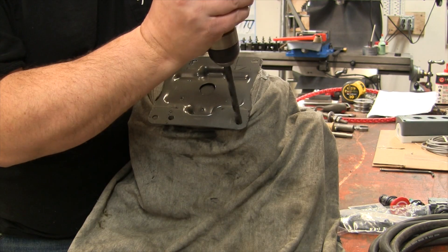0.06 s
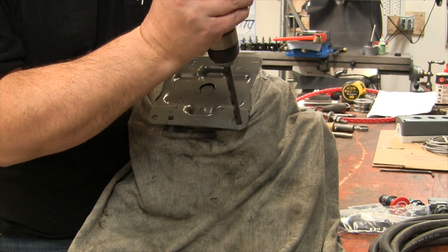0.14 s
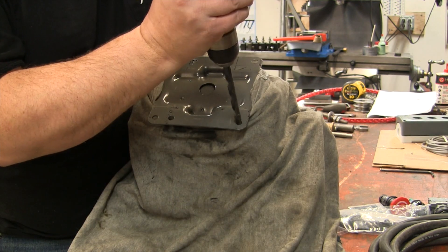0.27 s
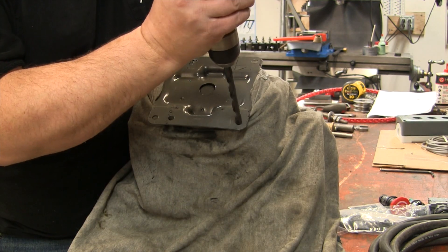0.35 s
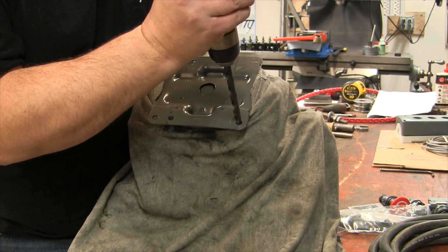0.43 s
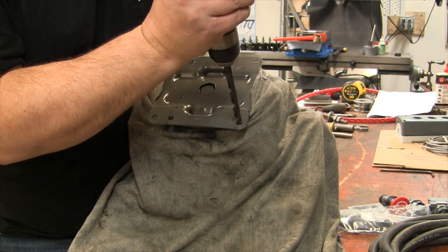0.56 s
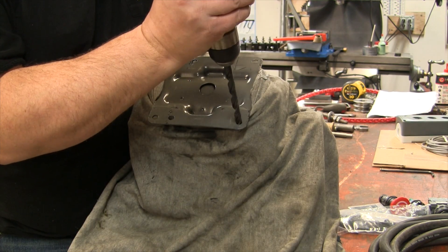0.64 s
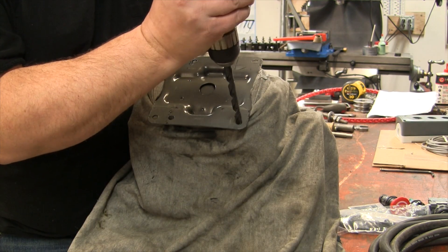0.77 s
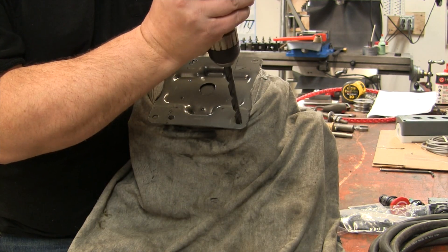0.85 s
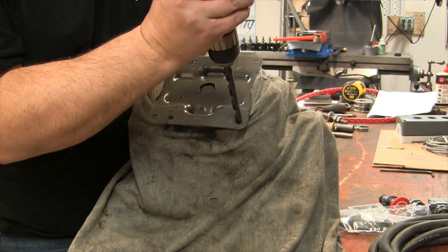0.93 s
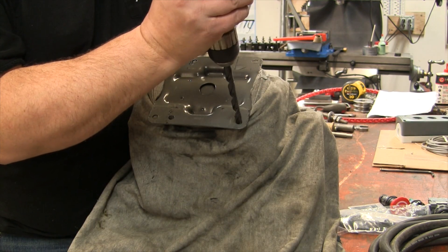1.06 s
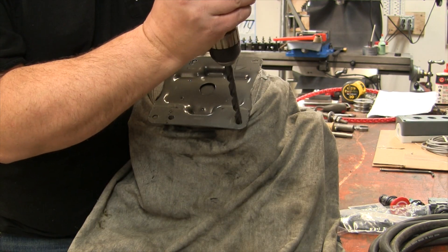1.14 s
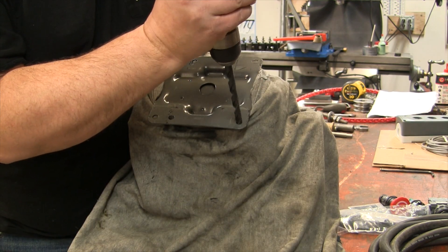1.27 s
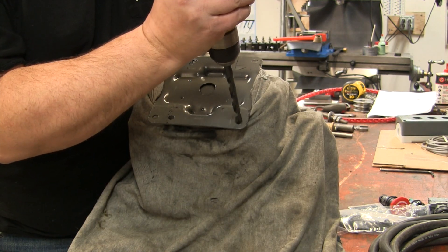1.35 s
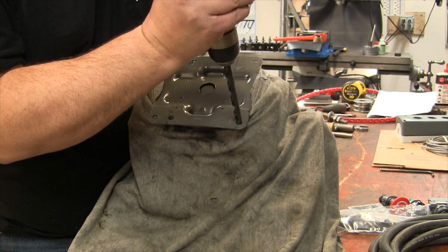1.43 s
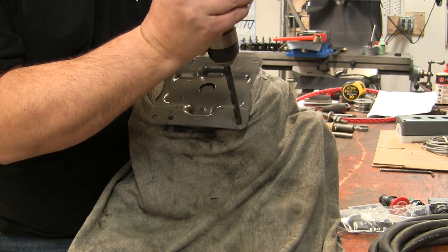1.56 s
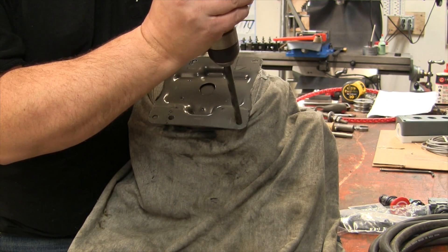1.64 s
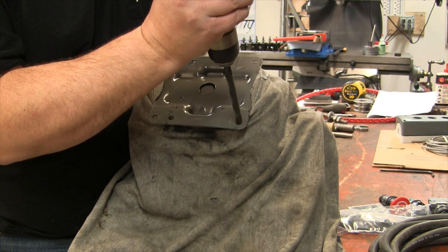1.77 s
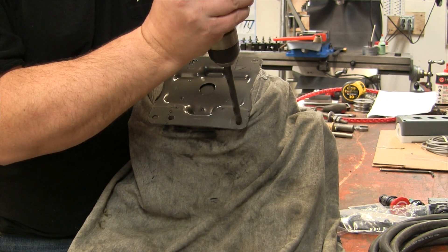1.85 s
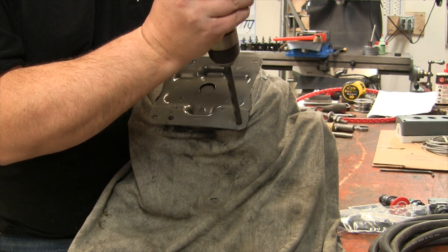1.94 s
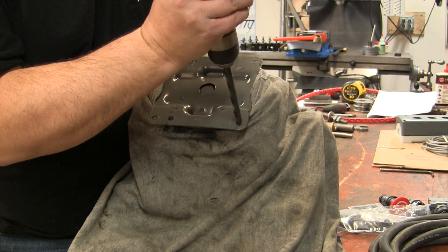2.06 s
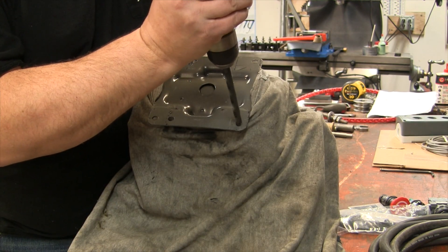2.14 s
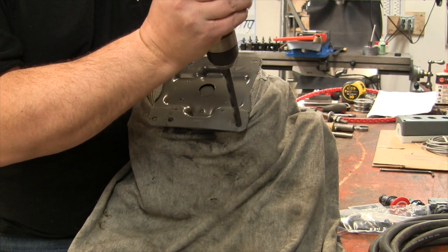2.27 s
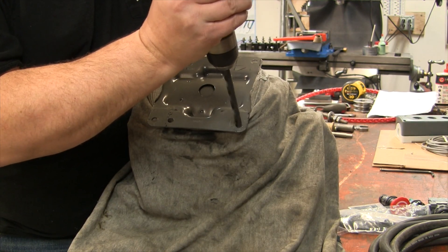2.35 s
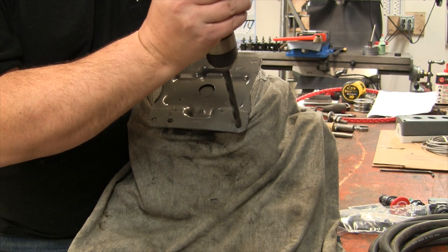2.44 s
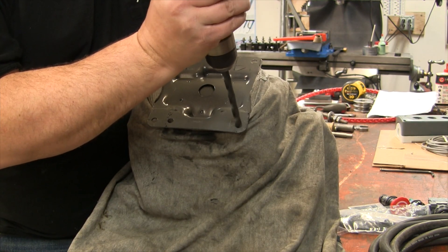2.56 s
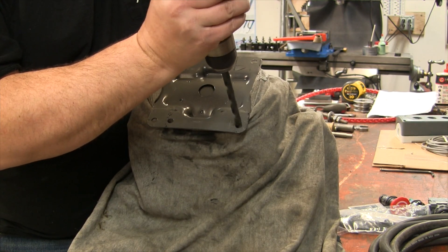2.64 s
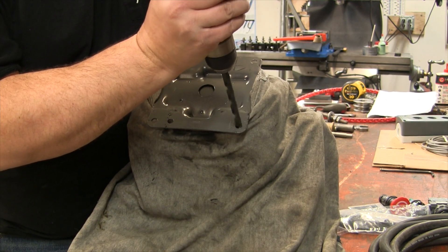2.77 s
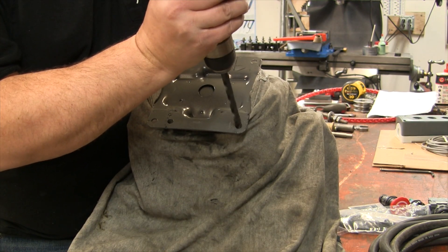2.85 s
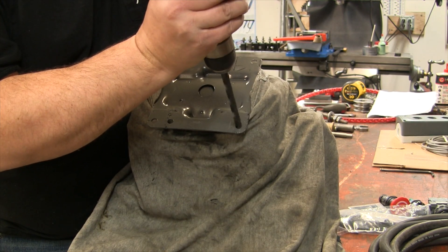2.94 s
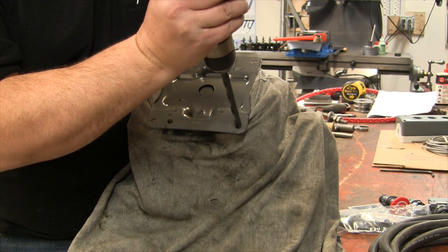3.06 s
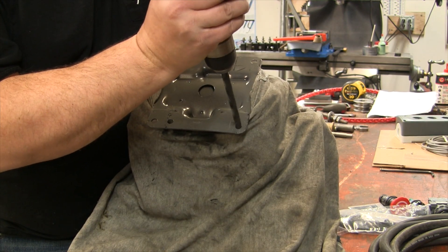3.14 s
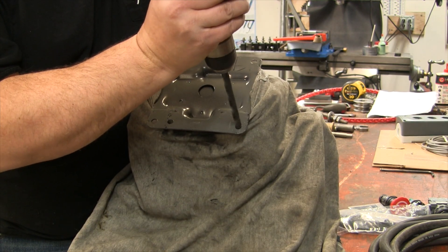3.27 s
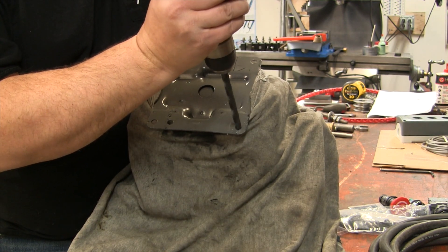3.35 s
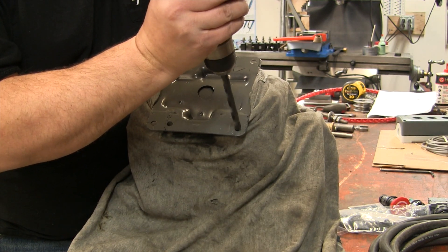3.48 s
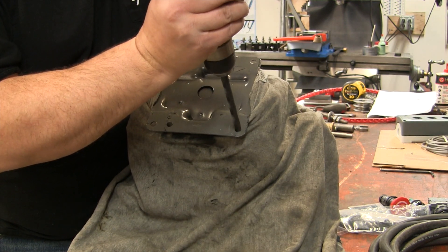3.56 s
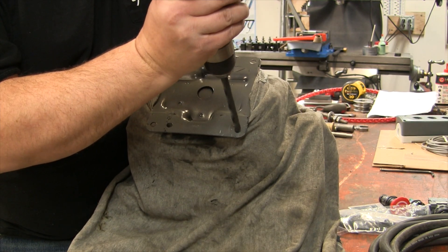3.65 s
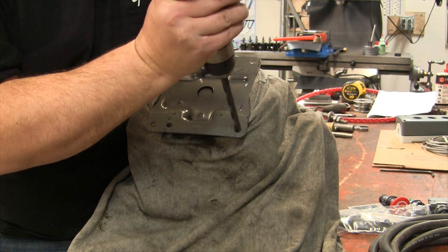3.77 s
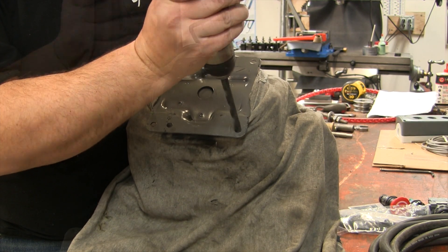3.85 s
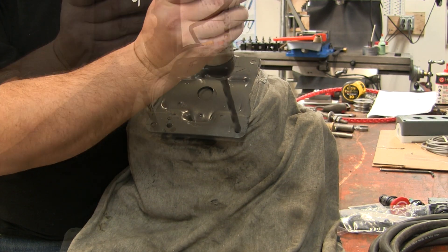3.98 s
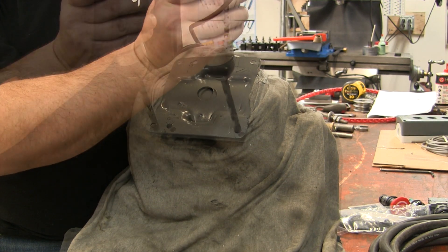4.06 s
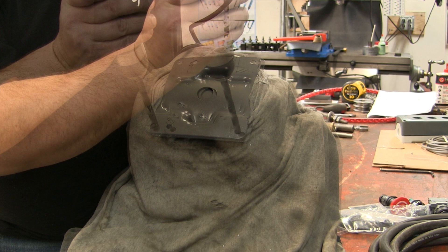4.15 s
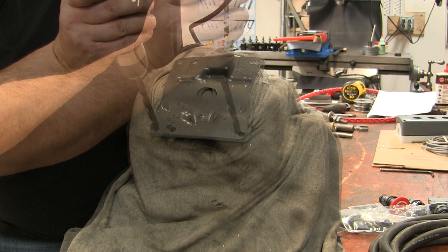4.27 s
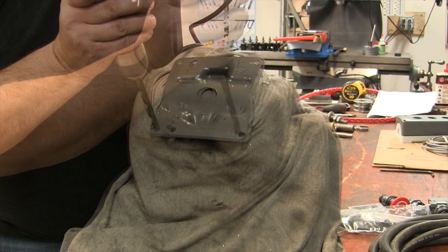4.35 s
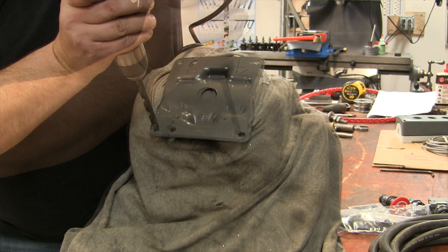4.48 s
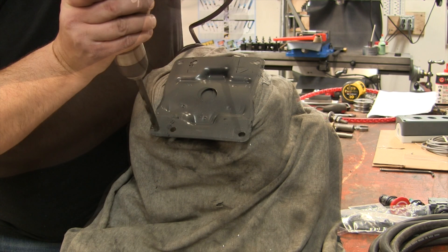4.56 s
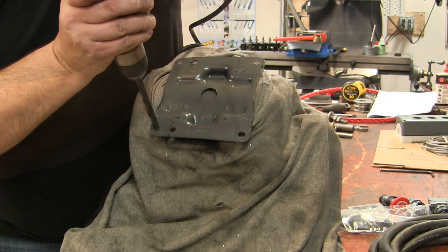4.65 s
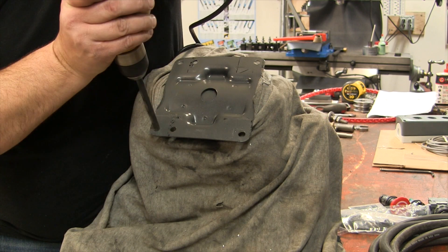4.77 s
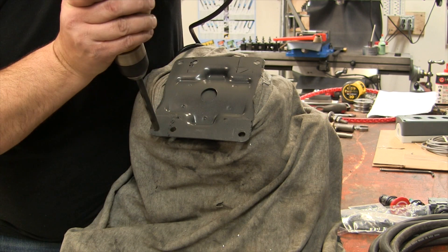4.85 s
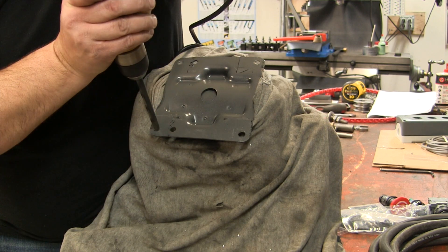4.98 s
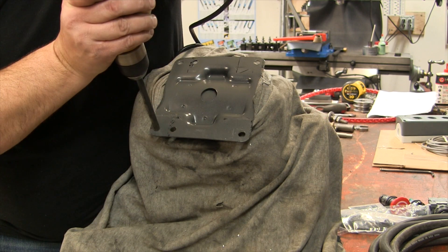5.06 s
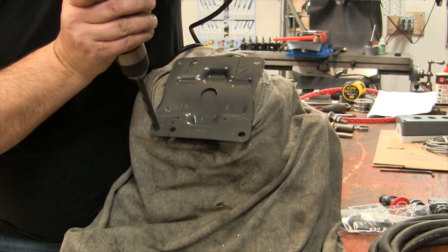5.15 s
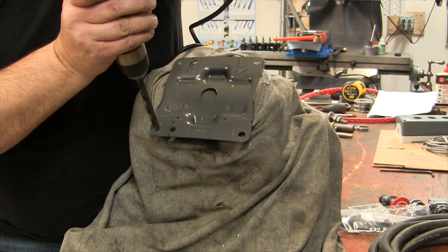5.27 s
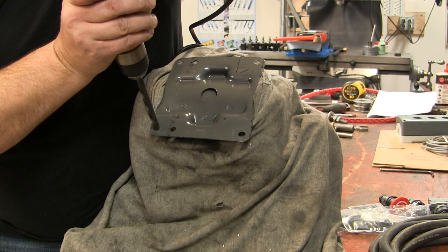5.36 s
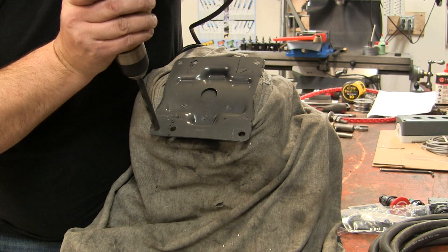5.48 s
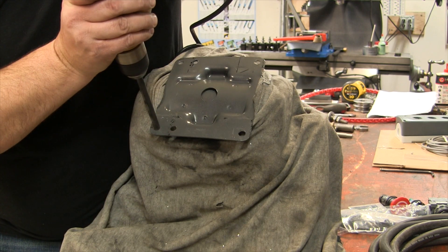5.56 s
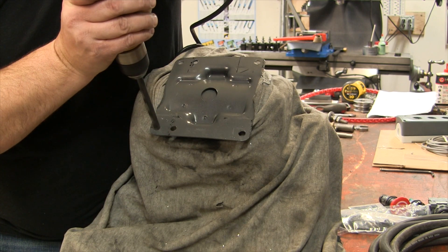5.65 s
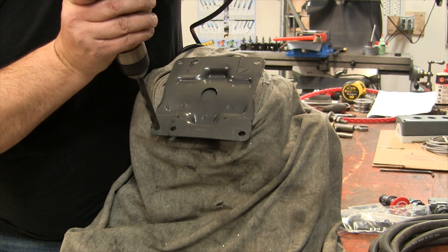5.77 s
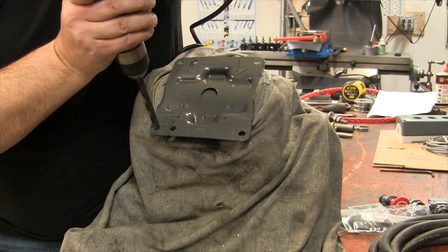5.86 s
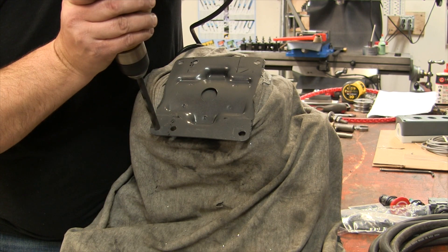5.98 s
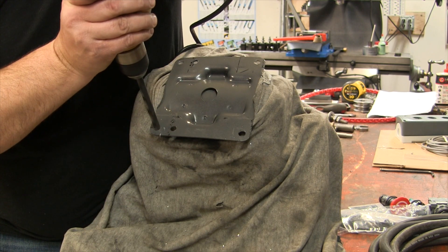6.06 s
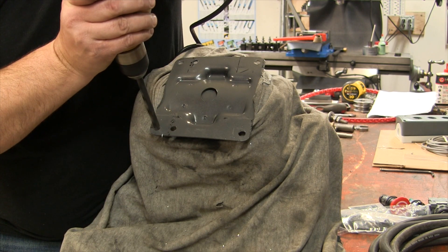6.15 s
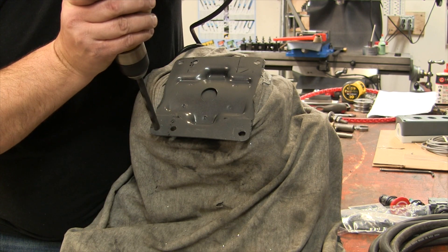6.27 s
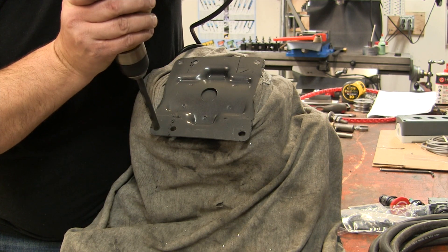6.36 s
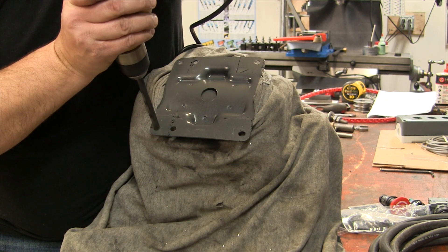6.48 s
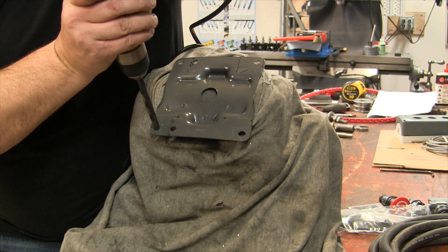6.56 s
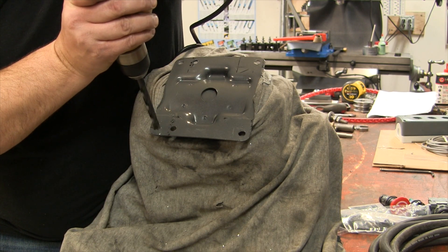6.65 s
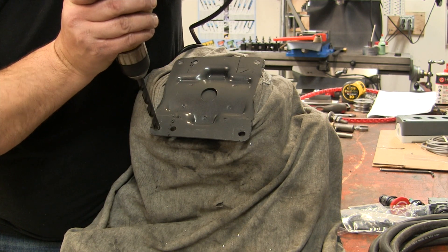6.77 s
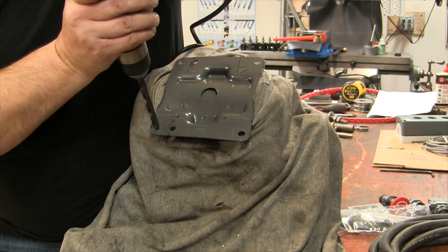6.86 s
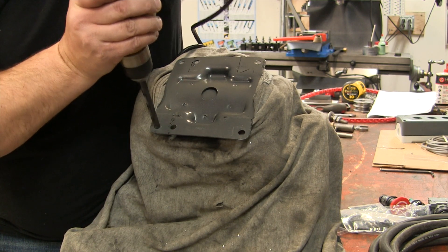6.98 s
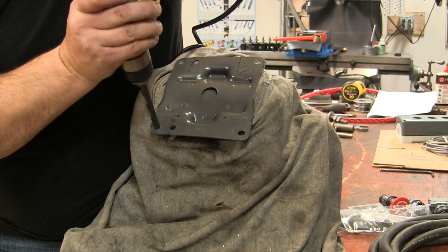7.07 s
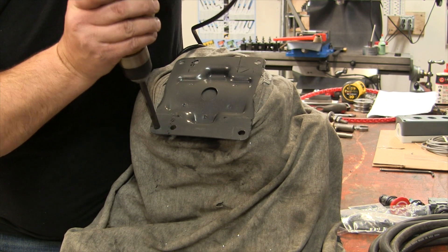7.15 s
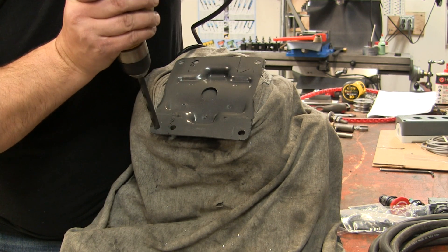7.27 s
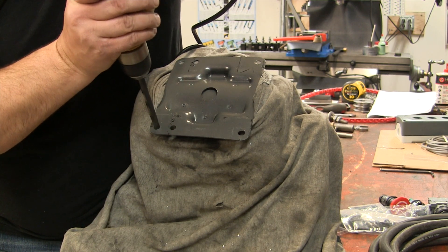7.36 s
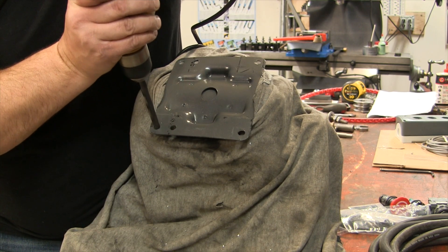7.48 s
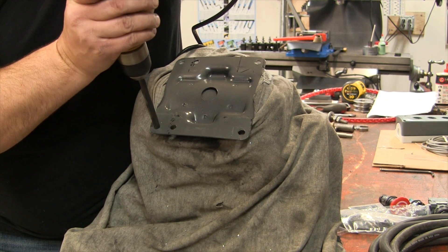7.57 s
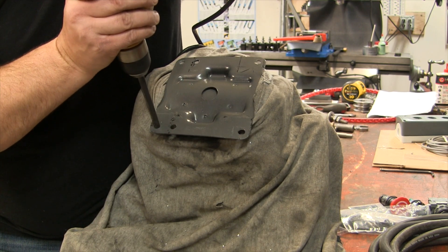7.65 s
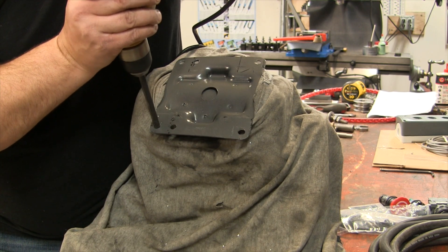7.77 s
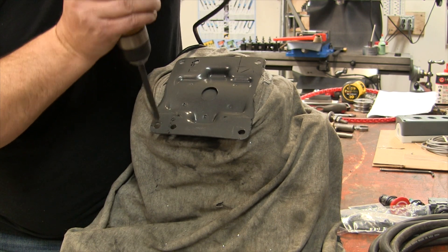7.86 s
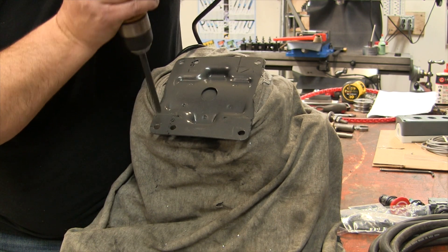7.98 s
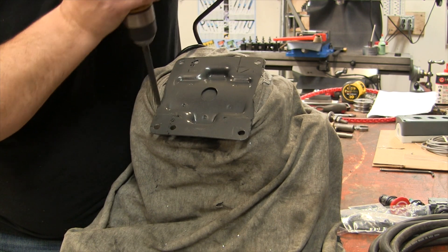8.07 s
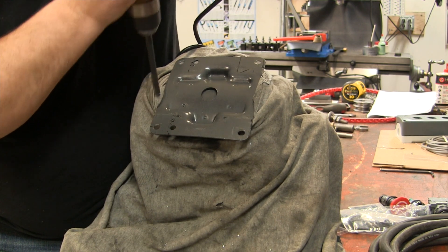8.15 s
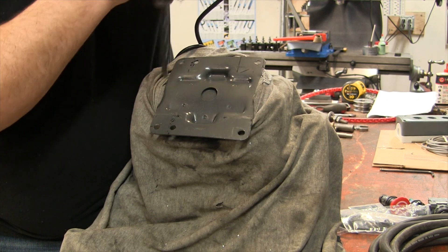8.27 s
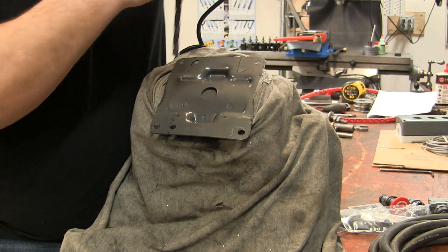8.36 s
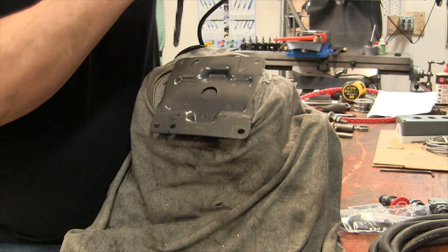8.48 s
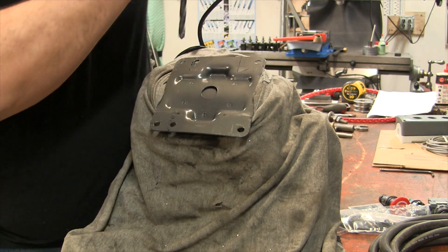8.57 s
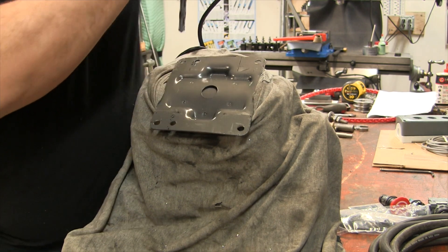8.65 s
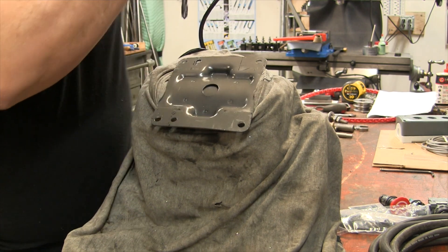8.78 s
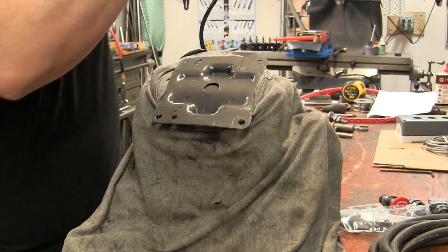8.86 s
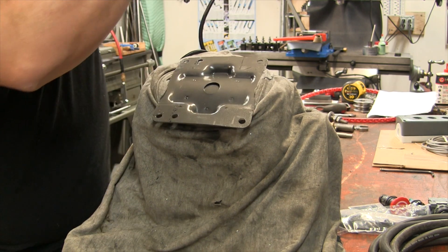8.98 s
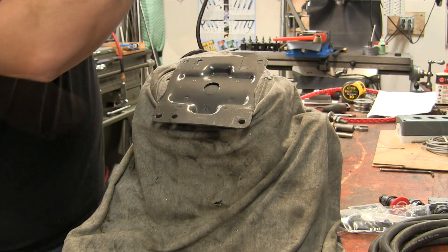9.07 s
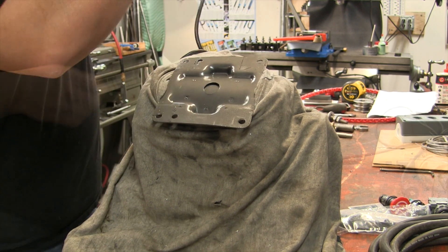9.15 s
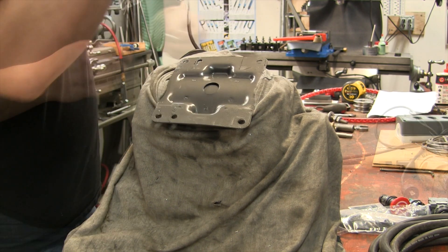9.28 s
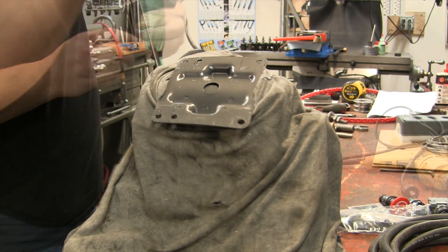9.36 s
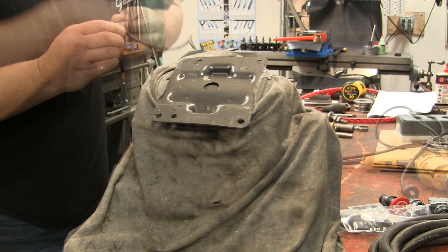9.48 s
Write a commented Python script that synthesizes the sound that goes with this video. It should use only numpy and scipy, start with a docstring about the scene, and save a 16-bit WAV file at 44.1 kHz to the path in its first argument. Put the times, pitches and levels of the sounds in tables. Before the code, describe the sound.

A cordless drill grinds and chatters through two bolt holes in a steel plate, squealing in the second, then whines free, coasts down and thuds onto a bench.

```python
"""Drilling two holes in steel

A cordless drill reams two bolt holes in a steel plate in a workshop, heard at one close microphone.
Noise bursts form the grinding gears and the flutes that bite the rim 13 to 40 times a second.
Between bites in the second hole, brief wavering tones make the edge squeak and the shank chirp.
The bit comes free with a rising and falling whine; gears rattle as the drill coasts, then it thuds down.
Steel clacks, loose ticks, a short room tail and a faint room tone surround the work."""
import sys
import numpy as np
from scipy import signal
from scipy.fft import rfft, irfft
from scipy.io import wavfile
from scipy.ndimage import uniform_filter1d

SR = 44100
rng = np.random.default_rng(int(sys.argv[2]) if len(sys.argv) > 2 else 0)


def store_pcm(level_fs):
    """Save levels as 16-bit WAV."""
    pcm = np.round(np.clip(level_fs, -1, 1) * 32767).astype(np.int16)
    wavfile.write(sys.argv[1], SR, np.atleast_2d(pcm).T)


N = 419876
TIME = np.arange(N) / SR
GRID_HZ = np.fft.rfftfreq(4096, 1 / SR) + 1e-3


def from_db(db):
    """Decibels to amplitude gain."""
    return 10 ** (np.asarray(db) / 20)


def rms_one(x):
    """Scale to unit power."""
    return x / np.sqrt(np.mean(x ** 2) + 1e-20)


def in_time(rows):
    """The columns of a curve, joined by straight lines over the whole scene."""
    s, *columns = np.transpose(rows)
    return [np.interp(TIME, s, c) for c in columns]


def drift(rate):
    """Random curve of unit power: straight lines between new values, rate of them a second."""
    return rms_one(np.interp(TIME * rate, np.arange(N), rng.standard_normal(N)))


def band(x, order, hz, kind="low"):
    """Butterworth filter: low-pass, high-pass or band-pass."""
    return signal.sosfilt(signal.butter(order, hz, kind, fs=SR, output="sos"), x)


def coloured(x, spectrum):
    """Minimum-phase filter with the given colour and unit power gain for white noise."""
    hz, db = np.transpose(spectrum)
    level = np.interp(np.log(GRID_HZ), np.log(hz), db)
    cepstrum = irfft(np.log(from_db(level)))
    half = len(cepstrum) // 2
    # folding the cepstrum onto positive time makes the filter causal
    cepstrum[1:half] *= 2
    cepstrum[half + 1:] = 0
    response = irfft(np.exp(rfft(cepstrum)))
    return signal.oaconvolve(x, response / np.linalg.norm(response))[:N]


def resonate(x, modes):
    """Parallel decaying resonances with unit power gain for white noise."""
    t = TIME[:SR // 5]
    response = np.zeros(len(t))
    for hz, width, db in modes:
        decay = np.exp(-np.pi * width * t)
        response += from_db(db) * width * decay * np.cos(2 * np.pi * hz * t)
    return signal.oaconvolve(x, response / np.linalg.norm(response))[:N]


def decaying(kicks, decay_s):
    """Each kick jumps up at once and dies away exponentially."""
    return signal.lfilter([1], [1, -np.exp(-1 / (decay_s * SR))], kicks + 1e-18)


def grit(rate, spread_db):
    """Dense tiny fractures: noise whose strength jumps at random and dies away at once."""
    sizes = from_db(spread_db * np.minimum(rng.exponential(1, N), 4))
    kicks = (rng.random(N) < rate / SR) * sizes
    power = decaying(kicks ** 2, 0.0012)
    return rms_one(np.sqrt(power) * rng.standard_normal(N))


def swell(s, length, lean):
    """Samples and envelope of one brief contact; a lean above 1 rises faster than it falls."""
    first = max(int((s - 3 * length) * SR), 0)
    at = np.arange(first, min(int((s + 4 * length) * SR), N))
    u = (at / SR - s) / length
    return at, np.exp(-np.log(4) * (u / np.where(u < 0, 1 / lean, lean)) ** 2)


def slips(rows, length, waver, waver_rate, sag):
    """Brief stick-slip tones whose pitch wavers and sags; returns the tones and their envelope."""
    tones, envelope, wander = np.zeros(N), np.zeros(N), drift(waver_rate)
    for s, db, hz in rows:
        at, shape = swell(s, length, lean=1.0)
        pitch = hz * (1 + waver * wander[at] - sag * (TIME[at] - s))   # sag: share of the pitch per s
        phase = 2 * np.pi * np.cumsum(pitch) / SR
        tones[at] += from_db(db) * shape * np.sqrt(2) * np.sin(phase)
        envelope[at] += from_db(db) * shape
    return tones, envelope


def burst(s, db, t60):
    """Noise that starts at once and dies away."""
    out, start = np.zeros(N), int(s * SR)
    t = TIME[:min(SR // 2, N - start)]
    out[start:start + len(t)] = from_db(db - 60 * t / t60) * rng.standard_normal(len(t))
    return out


# colour of the quiet room: (frequency [Hz], level per hertz [dB])
ROOM_TONE = [(12, -27.5), (20, -4), (27, -35.5), (139, -28), (233, -15), (266, -7.5), (401, -15),
             (1700, -10), (1950, -19), (13500, -38)]


def room_floor():
    """Steady coloured noise stands for the faint tone of the room."""
    return from_db(-51.0) * coloured(rng.standard_normal(N), ROOM_TONE)


def workshop(x, t60, dull_hz):
    """A short diffuse tail from the cluttered room, poorer in treble."""
    t = TIME[:SR // 2]
    tail = rng.standard_normal(len(t)) * from_db(-60 * t / t60) * (t > .006)
    tail = band(tail, 1, min(dull_hz, .45 * SR))
    return signal.oaconvolve(x, tail / np.linalg.norm(tail))[:N]


# where the bit sits: (time [s], share of the second hole, share of free running in what is not the first)
CONTACT = [(4.1, 0.35, 0), (4.65, 1, 0.047), (6.7, 1, 0.022), (6.92, 0.8, 0.53), (7.75, 0.93, 0.21),
           (7.9, 1, 1)]


def shares():
    """How much of the sound comes from the first hole, the tight second hole and the freed drill."""
    second, free = np.clip(in_time(CONTACT), 0, 1)
    return 1 - second, second * (1 - free), second * free


# colours of cutting in each hole and of the bare drill: (frequency [Hz], level per hertz [dB])
FIRST_HOLE = [(210, -53), (350, -26), (623, -12), (799, -4), (875, -6), (1170, -0.5), (1540, -2),
              (1950, 2.5), (2250, 0), (3160, -8.5), (3420, -2.5), (3790, -8), (4620, -8.5), (6750, -26.5),
              (8000, -39), (10400, -33), (17600, -120)]
SECOND_HOLE = [(210, -79.5), (350, -24.5), (498, -19.5), (898, -9.5), (1040, -5), (1870, -3), (2050, -3.5),
               (2430, 5), (3040, -4.5), (4210, 0), (4860, -1.5), (5330, -6.5), (6000, -10.5), (6660, -18.5),
               (8000, -23.5), (10400, -27), (17600, -120)]
FREE_RUN = [(180, -42.5), (300, -18), (506, -6.5), (564, -2.5), (647, -5.5), (774, -3), (1120, 3.5),
            (2200, -1.5), (2670, -1.5), (3710, -7), (4810, -8), (6970, -26), (8000, -28), (10400, -40),
            (17600, -120)]
# rings of plate and bit in the second hole: (frequency [Hz], width [Hz], level [dB])
STEEL = [(1090, 98, -9), (1900, 27, 2), (2280, 53, -9), (3200, 79, -4), (4860, 51, 1), (4730, 130, 8),
         (4960, 80, 17), (5830, 130, -29)]


def cut_colour(x, steel_db):
    """Vibration radiates through the first hole, the ringing second hole, then the bare drill."""
    first, second, free = x * np.sqrt(shares())
    plate = from_db(-2.5) * coloured(second, SECOND_HOLE) + from_db(steel_db) * resonate(second, STEEL)
    return coloured(first, FIRST_HOLE) + plate + coloured(free, FREE_RUN)


# colour of rubbing and breaking chips: (frequency [Hz], level per hertz [dB])
CHIPS = [(3530, -49), (6000, -1.5), (6420, -10.5), (6730, -11.5), (7380, -12.5), (10300, -10),
         (13200, -11.5), (14000, -19), (14700, -27), (15500, -45)]


def chip_colour(x):
    """Small chips radiate mostly treble."""
    return coloured(x, CHIPS)


# high modes of the bit: (frequency [Hz], width [Hz], level [dB])
BIT = [(5850, 180, -1), (7170, 220, 2), (7630, 140, -10), (7880, 300, -1), (9120, 250, 2), (9530, 360, -4),
       (10450, 200, 7.5), (11360, 130, -5), (11520, 190, 3.5), (12580, 200, -3)]


def bit_ring(x):
    """The bit's high modes, with little outside them."""
    return band(resonate(x, BIT), 6, [5500, 13000], "band")


# the stopped bit rattles loosely in the hole: (start [s], end [s], tick level [dB])
LOOSE = [(.45, .85, -36.5), (.85, 1.24, -45.5), (6.7, 6.93, -32)]
LOOSE_TICKS_PER_S, LOOSE_DECAY_S = 45, 0.0024


def loose_ticks():
    """Light random ticks while the bit rests in the hole."""
    sizes = sum(from_db(db) * ((TIME > start) & (TIME < end)) for start, end, db in LOOSE)
    born = rng.random(N) < LOOSE_TICKS_PER_S / SR
    scatter = from_db(3.9 * np.minimum(rng.standard_normal(N), 1.5))
    ticks = decaying(sizes * born * scatter, LOOSE_DECAY_S) * rng.standard_normal(N)
    return coloured(ticks, FIRST_HOLE) + from_db(-14) * chip_colour(ticks)


# sharp contacts of bit, chuck and trigger: (time [s], level [dB], t60 [s])
CLACKS = [(.054, -10, 0.041), (.095, -12.5, 0.02), (.126, -8.5, 0.045), (.169, -11, .038),
          (0.817, -41, .027), (.895, -28.5, 0.044), (.906, -26, .04), (1.24, -36, .02), (1.263, -2, 0.036),
          (1.614, -10, 0.018), (4.513, -20, 0.026), (6.799, -28, .03), (6.878, -25, .015),
          (6.928, -9.5, 0.034), (7.213, -7.5, .03), (7.371, -8.5, .025), (7.593, -5.5, 0.016),
          (7.782, -10, 0.013), (7.796, -15, 0.041), (9.171, -24.5, .037), (9.19, -26.5, 0.046)]
# the drill knocks on the bench: (time [s], level [dB], t60 [s], upper band edge [Hz])
THUDS = [(8.956, -25.5, 0.21, 353), (9.0, -22, 0.38, 281), (9.188, -30, 0.23, 1500),
         (9.226, -21.5, 0.23, 524), (9.275, -27, 0.53, 300), (9.452, -47, 0.09, 1400)]
# modes of the drill on the bench: (frequency [Hz], width [Hz], level [dB])
BENCH = [(168.5, 53, -30.5), (320, 19, -1.5), (433, 46, 3), (630, 85, 2.5), (990, 270, -7),
         (1500, 280, -2.5)]


def knocks():
    """Steel clacks on the plate, and dull thuds as the drill meets the bench, from decaying noise."""
    clacks = coloured(sum(burst(*row) for row in CLACKS), FIRST_HOLE)
    blows = np.zeros(N)
    for s, db, t60, hz in THUDS:
        blows += band(burst(s, db, t60) + 1e-18, 2, [130, max(hz, 200)], "band")
    return clacks + from_db(5.5) * resonate(blows, BENCH)


# the bit rings on after the drill is set down: (time [s], frequency [Hz], level [dB], t60 [s])
PING = (9.19, 3990, -47, .45)


def ping(s, hz, db, t60):
    """A close pair of long-ringing modes of the steel bit, beating against each other."""
    t = np.maximum(TIME - s, 0)
    pair = np.sin(2 * np.pi * hz * t) + .5 * np.sin(2 * np.pi * (hz - 14) * t)
    return from_db(db - 60 * t / t60) * pair


# slack gears rattle as the drill coasts to rest: (time [s], level [dB])
COAST = [(8.3, -88), (8.45, -31), (8.7, -20.5), (8.97, -24), (9.06, -42), (9.14, -90)]
# rings of the slack gears: (frequency [Hz], width [Hz], level [dB])
GEARS = [(3100, 440, 0), (4360, 1200, 1.5)]


def coasting():
    """Without load the gear teeth clatter against each other: grit through two broad resonances."""
    rattle = from_db(in_time(COAST)[0]) * grit(rate=690, spread_db=2.0)
    return band(resonate(rattle, GEARS), 2, [2000, 5800], "band")


# the trigger is pulled: (start [s], release [s], run-down t60 [s], level [dB])
PULLS = [(-.05, .41, 1.08, 0), (0.904, 0.86, 0.46, -18), (1.264, 6.64, 0.29, 0), (6.915, 8.975, .3, 0)]
SPIN_UP_S, IDLE_DB = 0.015, -31   # the idle level is always underneath


def running():
    """Level of the drill in dB: it starts almost at once on each pull and runs down after the release."""
    gain = from_db(IDLE_DB)
    for start, release, t60, db in PULLS:
        spin_up = np.clip((TIME - start) / SPIN_UP_S, 0, 1)
        gain = gain + spin_up * from_db(db - 60 * np.maximum(TIME - release, 0) / t60)
    return 20 * np.log10(gain)


SURGE_DB, SURGE_DECAY_S = 12, .05


def surge():
    """The rotor strains just after each pull: extra level in dB that dies away."""
    extra = np.zeros(N)
    for start, *_ in PULLS:
        extra += SURGE_DB * (TIME > start) * np.exp(-np.abs(TIME - start) / SURGE_DECAY_S)
    return extra


# speed of the bit in the first hole, the second hole and the second hole again; each pass opens with
# a bite: (time [s], speed [bites/s])
FIRST_PASS = [(1.616, 18.7), (1.84, 29.2), (2.09, 33.4), (2.33, 27.0), (2.62, 28.0), (2.97, 20.5),
              (3.17, 23.0), (3.47, 15.5), (3.62, 25.0), (3.95, 20.4), (4.13, 16.4), (4.54, 20.3)]
SECOND_PASS = [(4.573, 17.2), (4.75, 39.3), (4.96, 29.3), (5.13, 35.8), (5.37, 13.0), (5.57, 36.5),
               (5.66, 31.8), (5.93, 15.4), (6.13, 32.4), (6.34, 19.8), (6.51, 33.8), (6.66, 21.9)]
THIRD_PASS = [(6.932, 22.6), (7.19, 32.9), (7.36, 21.1), (7.5, 28.9), (7.85, 34.5)]
# the three passes: (speed curve, nominal bite length [s])
PASSES = [(FIRST_PASS, 0.0098), (SECOND_PASS, .0125), (THIRD_PASS, 0.0083)]
USUAL_BITES_PER_S = 27


def bit_speed():
    """Bites per second, and a gate that is open while the flutes touch the rim."""
    speed, = in_time(FIRST_PASS + SECOND_PASS + THIRD_PASS)
    touching = sum(1. * ((TIME > curve[0][0]) & (TIME < curve[-1][0])) for curve, _ in PASSES)
    return speed, uniform_filter1d(touching, size=2000)


ROTOR_TURNS_PER_BITE = 22.3
ROTOR_DB, ROTOR_FIRST_HOLE_DB, ROTOR_DB_PER_OCTAVE = -44, -52, 9   # the hum fades as the rotor slows


def rotor_hum(speed, touching):
    """The rotor hums at a multiple of the bit's speed, with a slight waver and one overtone."""
    turn = 2 * np.pi * np.cumsum(ROTOR_TURNS_PER_BITE * speed * (1 + .03 * drift(220))) / SR
    hum_db = ROTOR_DB + (ROTOR_FIRST_HOLE_DB - ROTOR_DB) * shares()[0]
    hum_db = hum_db + ROTOR_DB_PER_OCTAVE * np.log2(speed / USUAL_BITES_PER_S)
    hum_db = hum_db + surge() + 4 * np.minimum(drift(30), 1)
    return np.sqrt(2) * touching * from_db(hum_db) * (np.sin(turn) + .5 * np.sin(2 * turn))


# the freed drill whines up to a top pitch, then down: (time [s], level [dB])
WHINE = [(7.58, -45), (7.625, -17), (7.75, -23), (7.83, -30), (7.92, -16.5), (8.13, -28), (8.3, -29),
         (8.4, -46)]
WHINE_TOP_S, WHINE_TOP_HZ = 7.74, 4070
WHINE_ARCH_HZ_PER_S2, WHINE_FALL_PER_S = 130000, .77


def free_whine():
    """Unloaded, the drill whines: pitch arches up to the top, then falls exponentially."""
    since = TIME - WHINE_TOP_S
    rise_hz = np.maximum(WHINE_TOP_HZ - WHINE_ARCH_HZ_PER_S2 * np.minimum(since, 0) ** 2, 0)
    whine_hz = rise_hz * np.exp(-WHINE_FALL_PER_S * np.maximum(since, 0))
    waver = 0.0028 * drift(250) + .04 * np.clip(-10 * since, 0, 1) * drift(700)   # rough until the top
    phase = 2 * np.pi * np.cumsum(whine_hz * (1 + waver)) / SR
    sounding = uniform_filter1d(1. * ((TIME > WHINE[0][0]) & (TIME < WHINE[-1][0])), size=1500)
    level = sounding * from_db(in_time(WHINE)[0] + 1.8 * drift(60))
    return np.sqrt(2) * level * (np.sin(phase) + from_db(-24) * np.sin(2 * phase))


# the coasting drill hoots: (time [s], level [dB], frequency [Hz])
HOOTS = [(8.63, -24.5, 572), (8.73, -29.5, 595)]


def motor(speed, touching):
    """The rotor hums under load; unloaded, the drill whines and, coasting, gives low sagging hoots."""
    hoots = slips(HOOTS, length=.028, waver=0.017, waver_rate=160, sag=1.074)[0]
    return rotor_hum(speed, touching) + free_whine() + hoots


def snaps(hiss_db, per_s, level_db, spread_db):
    """Now and then a chip breaks off with a tiny bright tick, as long as the bit is in the steel."""
    born = rng.random(N) < per_s * (1 - shares()[2]) / SR
    sizes = born * from_db(hiss_db + level_db + spread_db * np.minimum(rng.exponential(1, N), 2))
    return chip_colour(decaying(sizes, 0.0019) * rng.standard_normal(N))


# colour of the drill's housing: (frequency [Hz], level per hertz [dB])
HOUSING = [(53, -65), (90, -22), (145, -7), (199, -4.5), (254, -3.5), (296, 4), (329, 1.5), (394, 2.5),
           (432, 3.5), (550, 6), (720, -7), (1210, -120)]


def gearbox(grind_db, rumble_db, hiss_db):
    """Rattling gear teeth, the hum of the housing and the hiss of the bit, which rings in the tight hole."""
    grind = cut_colour(from_db(grind_db - 1.0) * grit(rate=1500, spread_db=2.0), steel_db=-10.0)
    shake = from_db(rumble_db) * grit(rate=1000, spread_db=-1.5)
    lowest_mode = resonate(shake, [(207.3, 19, 0)])
    rumble = coloured(shake, HOUSING) + from_db(-9.5) * lowest_mode
    rubbing, tight = from_db(hiss_db - 1.5) * grit(rate=1000, spread_db=3.0), shares()[1]
    hiss = chip_colour(rubbing * np.sqrt(1 - .85 * tight))
    ringing = from_db(-1) * bit_ring(rubbing * np.sqrt(tight))
    return grind + rumble + hiss + ringing + snaps(hiss_db, per_s=30, level_db=6.5, spread_db=5.0)


# each bite makes the plate knock in the first hole and chatter in the second:
# (frequency [Hz], level against the bite [dB], glide [share of the pitch per s])
KNOCK = [(1318, -13, 0.84), (1650, -12, -0.83), (3450, -19, 0.82)]
CHATTER = [(1250, -14, 4.5), (1900, -15.5, -3.5), (2440, -8.5, 2.5), (3690, -11, 6)]


def chatter(rows, tones, scatter, waver):
    """Each bite sets the plate chattering in short gliding tones, never twice alike."""
    out, chance = np.zeros(N), rng.standard_normal((len(rows), len(tones), 2))
    wander = drift(450)
    for (s, db, length), draws in zip(rows, chance):
        at, shape = swell(s, length, lean=0.98)
        for (hz, share_db, glide), (detune, strength) in zip(tones, draws):
            pitch = hz * (1 + scatter * detune + waver * wander[at] + glide * (TIME[at] - s))
            tone = np.sin(2 * np.pi * np.cumsum(pitch) / SR)
            out[at] += from_db(db + share_db + 3.2 * strength) * shape * tone
    return np.sqrt(2) * out


# the edge holds a piercing note: (time [s], level [dB], frequency [Hz])
SCREECHES = [(4.323, -20, 12700), (4.586, -7.5, 12900), (5.894, -13, 11950), (6.529, -12, 12350),
             (6.595, -18, 12000), (7.315, -25, 12570)]


def screeches():
    """When the edge catches hard it holds one piercing note."""
    return slips(SCREECHES, length=0.006, waver=.008, waver_rate=840, sag=0.62)[0]


def flute_times(curve, offset):
    """The moments at which a flute comes round, offset by a share of the cycle."""
    t = TIME[(TIME >= curve[0][0]) & (TIME <= curve[-1][0])]
    cycles = np.cumsum(np.interp(t, *np.transpose(curve))) / SR
    return np.interp(np.arange(offset, cycles[-1]), cycles, t)


# between bites in the second hole the edge squeaks, then the shank chirps:
# (time [s], squeak level [dB], squeak frequency [Hz], chirp level [dB])
STICKING = [(4.62, -22, 10750, -16), (4.98, -24, 10850, -10), (5.18, -29, 10400, -13.5),
            (5.37, -34, 10440, -24), (5.48, -19.5, 10900, -9.5), (5.719, -24.5, 10540, -30),
            (5.88, -20, 11900, -9.5), (6.15, -20, 11700, -14.5), (6.44, -23, 11100, -11.5),
            (6.62, -28, 12000, -16)]
STICK_SHARE = .44   # share of a cycle from a bite to the next squeak
SQUEAK_SCATTER_DB, SQUEAK_DETUNE = 2.65, 0.024
CHIRP_LAG_S, CHIRP_SCATTER_DB, CHIRP_DETUNE = .009, 3.5, 0.0178
CHIRP_HZ, CHIRP_HZ_PER_OCTAVE = 4818, 231   # at the usual speed; it rises with speed


def sticks():
    """Squeaks between the bites of the second pass, and the chirps after them: rows (s, dB, Hz)."""
    s = flute_times(SECOND_PASS, STICK_SHARE)
    times, *columns = np.transpose(STICKING)
    squeak_db, squeak_hz, chirp_db = [np.interp(s, times, c) for c in columns]
    octaves = np.log2(np.interp(s, *np.transpose(SECOND_PASS)) / USUAL_BITES_PER_S)
    chance = rng.standard_normal((len(s), 4)).T
    squeak_db = squeak_db + SQUEAK_SCATTER_DB * chance[0]
    squeak_hz = squeak_hz * (1 + SQUEAK_DETUNE * chance[1])
    chirp_db = chirp_db + CHIRP_SCATTER_DB * chance[2]
    chirp_hz = (CHIRP_HZ + CHIRP_HZ_PER_OCTAVE * octaves) * (1 + CHIRP_DETUNE * chance[3])
    return list(zip(s, squeak_db, squeak_hz)), list(zip(s + CHIRP_LAG_S, chirp_db, chirp_hz))


# the bit snags and the shank shrieks: (time [s], level [dB], frequency [Hz])
SNAGS = [(4.315, -8.5, 4800), (6.487, -11, 5900), (6.941, -7, 4080), (7.314, -6.5, 6160),
         (7.321, -7.5, 5820), (7.368, -13, 5870)]


def squeaks():
    """The edge squeaks and shakes the bit, then the shank chirps; also returns how firmly the edge sticks."""
    squeak_rows, chirp_rows = sticks()
    edge, stuck = slips(squeak_rows, length=.0065, waver=0.016, waver_rate=1100, sag=2.49)
    shank, shaking = slips(chirp_rows + SNAGS, length=0.009, waver=0.022, waver_rate=1000, sag=.8)
    rasp = bit_ring(stuck * grit(rate=1500, spread_db=4.0))
    upper_steel = [mode for mode in STEEL if mode[0] > 4000]   # the shank drags these modes along
    judder = resonate(shaking * rng.standard_normal(N), upper_steel)
    squeal = from_db(-2.5) * edge + from_db(0.5) * rasp
    return squeal + from_db(-4.5) * shank + from_db(-10.5) * judder, stuck


# how hard the flutes are pressed on the rim: (time [s], bite level [dB])
PRESSURE = [(1.6, -16.5), (1.8, -10.5), (2.0, -25), (2.8, -22), (2.98, -12), (3.78, -12.5), (4.1, -15),
            (4.53, -21.5), (4.66, -14.5), (5.35, -16), (5.5, -13), (6.55, -14), (7.0, -23.5), (7.25, -19),
            (7.55, -16.5), (7.75, -10.5), (7.85, -28)]
BITE_SCATTER_DB, BITE_LENGTH_SCATTER = 1.7, .18   # no two bites are alike


def bites_of(curve, length):
    """One bite per flute, as strong as the pressure: rows (s, dB, length s)."""
    s = flute_times(curve, 0)
    strength, stretch = rng.standard_normal((len(s), 2)).T
    db = np.interp(s, *np.transpose(PRESSURE)) + BITE_SCATTER_DB * strength
    return np.column_stack([s, db, max(length, .004) * np.exp(BITE_LENGTH_SCATTER * stretch)])


def bite_force(rows):
    """The flutes press on the rim in brief surges that rise faster than they fall."""
    force = np.zeros(N)
    for s, db, length in rows:
        at, shape = swell(s, length * .9, lean=1.3)
        force[at] += from_db(db) * shape
    return force


def plate_rings(force, level_db, swing_db, tilt_db, width_hz):
    """The point of contact wanders round the rim, so bites favour changing modes of the plate."""
    out = np.zeros(N)
    for hz in np.geomspace(1080, 5000, num=12) * (1 + .02 * rng.standard_normal(12)):
        coupling = rms_one(from_db(swing_db * np.minimum(drift(35), 2)))
        drive = force * coupling * rng.standard_normal(N)
        mode_db = level_db + tilt_db * np.log2(hz / 1080)
        out += from_db(mode_db) * resonate(drive, [(hz, width_hz, 0)])
    return band(out, 3, [800, 5500], "band")


def bites(force, grind_db):
    """Each flute tears a chip from the rim: fractures, ringing steel, a spray of treble and a jolt."""
    tear = cut_colour(force * from_db(-0.87) * grit(rate=2200, spread_db=4.0), steel_db=-15.0)
    tear = band(tear + 1e-18, 2, 650, "high")   # the small chip radiates little bass
    ring_force = force + 0.36 * from_db(grind_db)
    rings = plate_rings(ring_force, level_db=-17, swing_db=9.5, tilt_db=-0.5, width_hz=67)
    spray = chip_colour(force * from_db(-24.5) * grit(rate=460, spread_db=4.5))
    jolt = band(force ** 2 * rng.standard_normal(N) + 1e-18, 1, 90)   # squared: mostly hard bites shake the bench
    return tear + rings + spray + from_db(-22.5) * jolt


# the drill under load: (time [s], gear grind [dB], housing rumble [dB], chip hiss [dB])
LOAD = [(0, -16, -36.5, -36.5), (.35, -22, -36, -47), (1.5, -23, -43, -53), (1.7, -17, -34, -38.5),
        (2.5, -17.5, -35, -41.5), (2.82, -18.5, -37.5, -43), (3.0, -15.5, -31.5, -34.5),
        (3.45, -19.5, -42.5, -38.5), (4.3, -20, -46, -38.5), (4.54, -25, -43.5, -44),
        (4.63, -11, -41.5, -36), (5.15, -20, -59, -38), (5.5, -13.5, -51, -34.5), (6.6, -18.5, -53, -37.5),
        (7.05, -23, -48.5, -39.5), (7.55, -21, -46.5, -39), (7.7, -17.5, -48, -32),
        (7.9, -19.5, -50, -38.5), (8.65, -20.5, -54, -35), (8.98, -25.5, -54.5, -32)]
GRIND_DB_PER_OCTAVE, HISS_DB_PER_OCTAVE = 2, 7   # a faster bit is louder


def drill_levels(speed, touching):
    """Grind, rumble and hiss in dB follow load and trigger; grind and hiss also follow speed."""
    octaves, on_db = touching * np.log2(speed / USUAL_BITES_PER_S), running()
    grind_db, rumble_db, hiss_db = in_time(LOAD)
    grind_db = grind_db + on_db + GRIND_DB_PER_OCTAVE * octaves
    rumble_db = rumble_db + 0.85 * on_db   # rumble and hiss each die away at their own pace
    hiss_db = hiss_db + 1.16 * on_db + HISS_DB_PER_OCTAVE * octaves
    return grind_db, rumble_db, hiss_db


def scene():
    """Drill, plate and room at one close microphone."""
    speed, touching = bit_speed()
    grind_db, rumble_db, hiss_db = drill_levels(speed, touching)
    first, second, third = [bites_of(curve, length) for curve, length in PASSES]
    force = bite_force(np.vstack([first, second, third]))
    squeal, stuck = squeaks()
    cutting = gearbox(grind_db, rumble_db, hiss_db) + bites(force, grind_db)
    cutting = cutting / (1 + 3.1 * stuck)   # a stuck edge cuts less
    plate = chatter(first, KNOCK, scatter=0.0499, waver=0.023)
    plate = plate + chatter(second, CHATTER, scatter=0.0393, waver=0.021)
    handling = loose_ticks() + knocks() + ping(*PING)
    near = handling + coasting() + motor(speed, touching) + plate + squeal + screeches() + cutting
    tail = from_db(-17.0) * workshop(near, t60=0.22, dull_hz=8000)
    return (near + tail + room_floor())[None]


CUTOFF_HZ = 15400


def record(dry):
    """The loudest peaks are rounded off below a ceiling and the top treble is cut steeply."""
    ceiling = .95
    rounded = dry / (1 + (dry / ceiling) ** 6) ** (1 / 6)
    return signal.sosfilt(signal.ellip(10, .1, 80, CUTOFF_HZ, fs=SR, output="sos"), rounded)


dry = scene()
out = record(dry)
store_pcm(out)
```